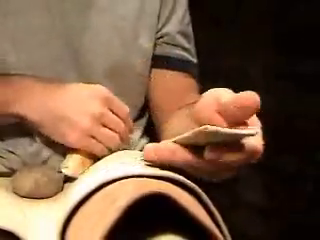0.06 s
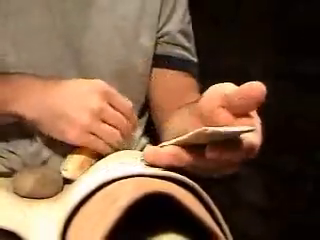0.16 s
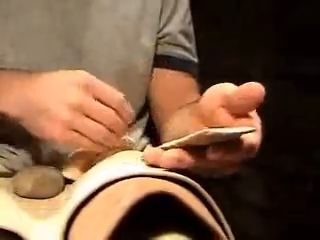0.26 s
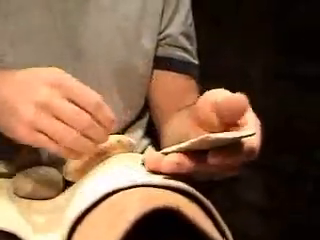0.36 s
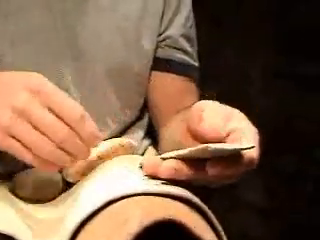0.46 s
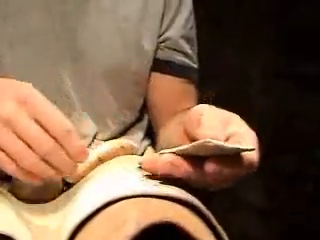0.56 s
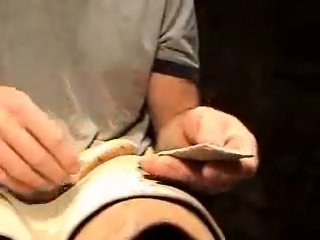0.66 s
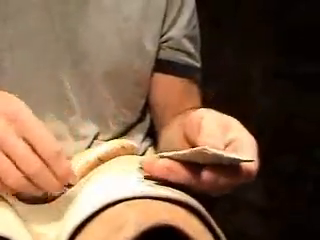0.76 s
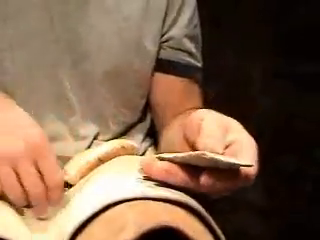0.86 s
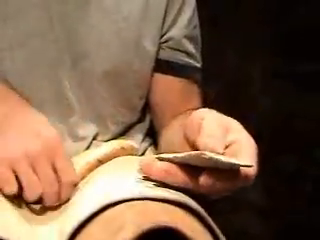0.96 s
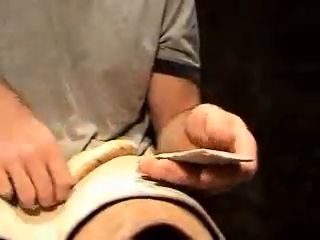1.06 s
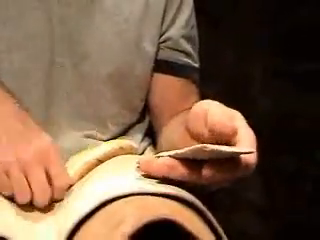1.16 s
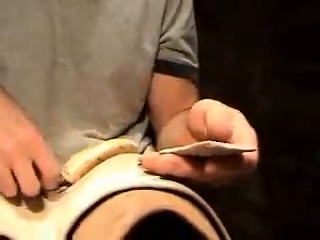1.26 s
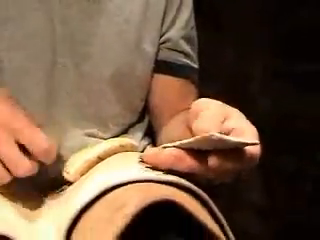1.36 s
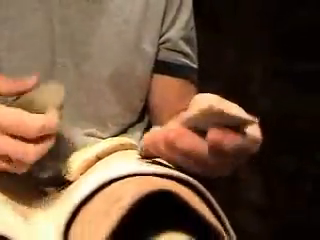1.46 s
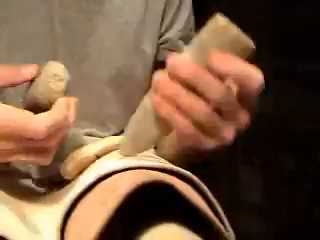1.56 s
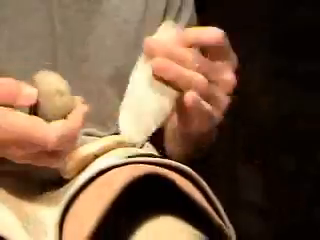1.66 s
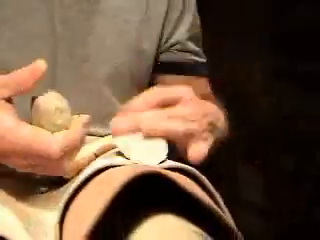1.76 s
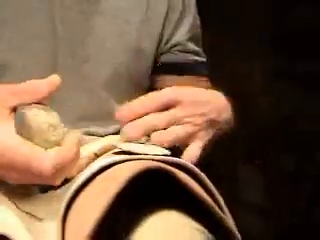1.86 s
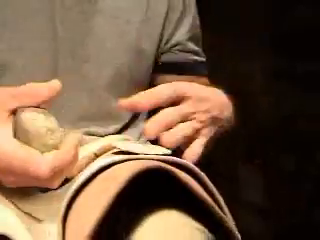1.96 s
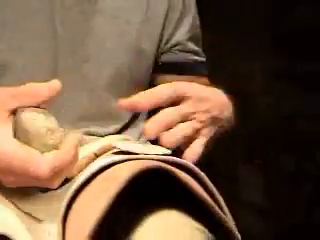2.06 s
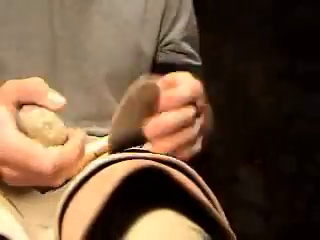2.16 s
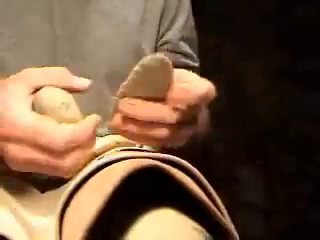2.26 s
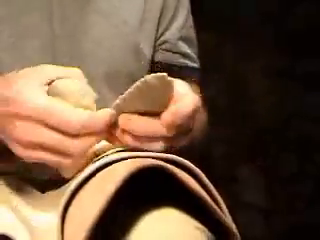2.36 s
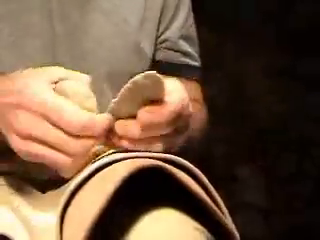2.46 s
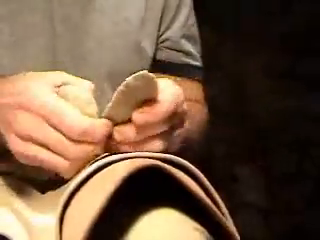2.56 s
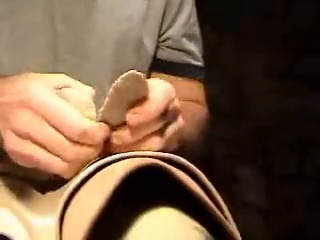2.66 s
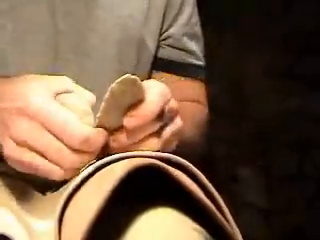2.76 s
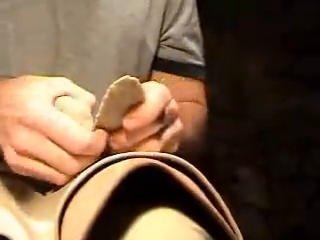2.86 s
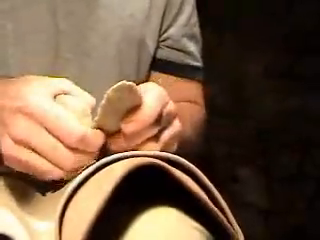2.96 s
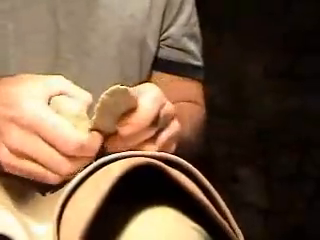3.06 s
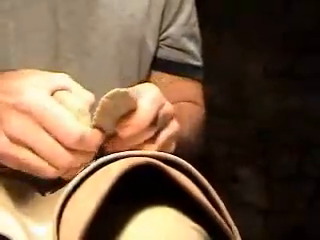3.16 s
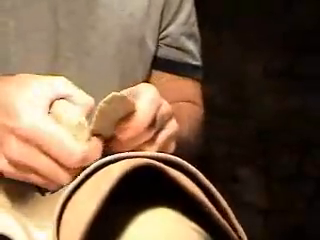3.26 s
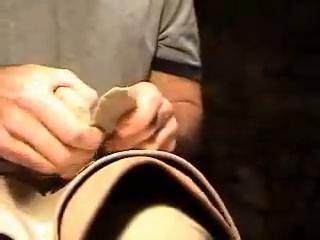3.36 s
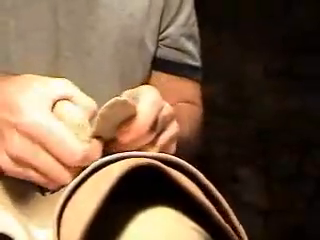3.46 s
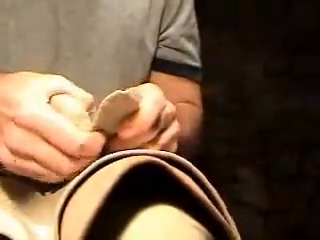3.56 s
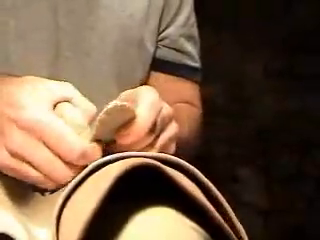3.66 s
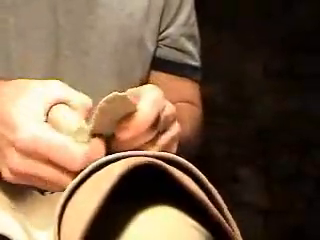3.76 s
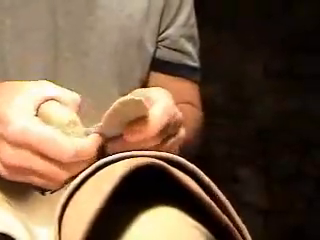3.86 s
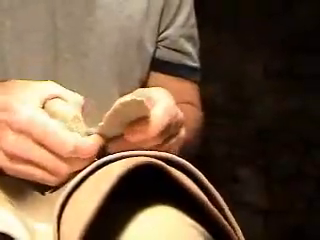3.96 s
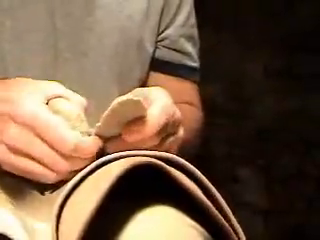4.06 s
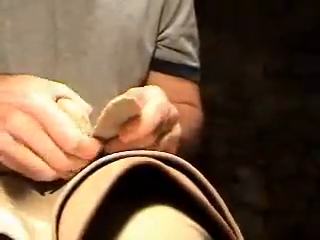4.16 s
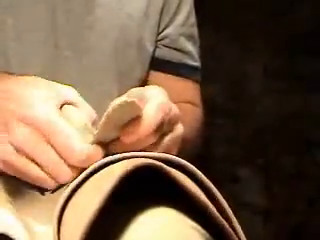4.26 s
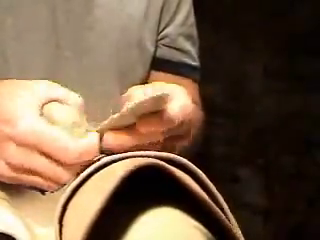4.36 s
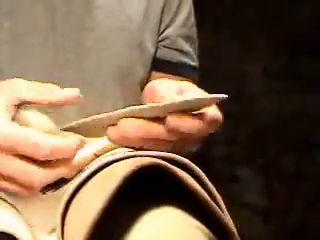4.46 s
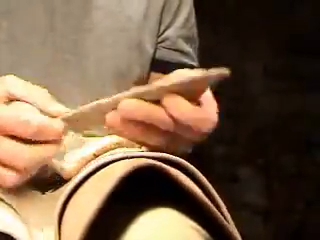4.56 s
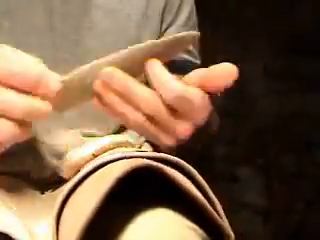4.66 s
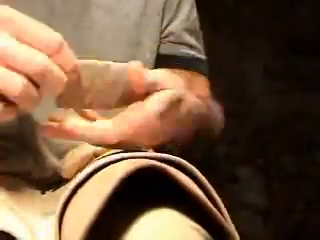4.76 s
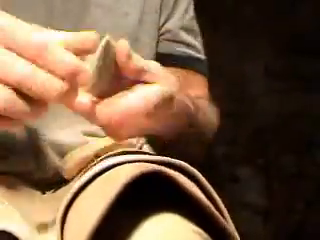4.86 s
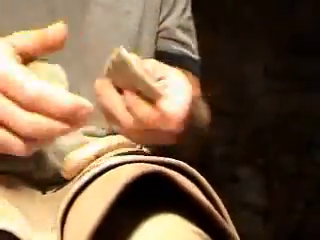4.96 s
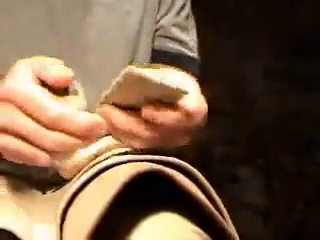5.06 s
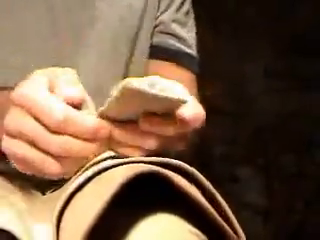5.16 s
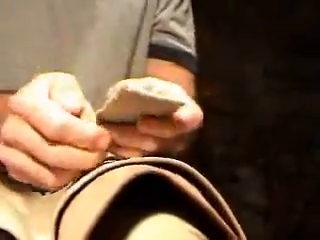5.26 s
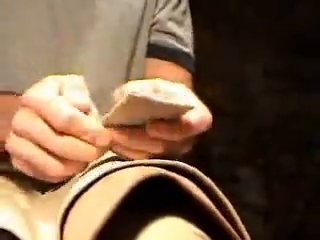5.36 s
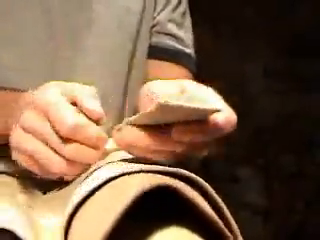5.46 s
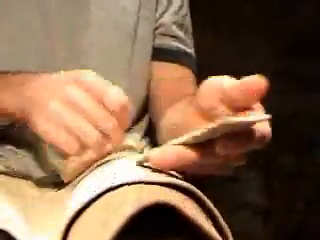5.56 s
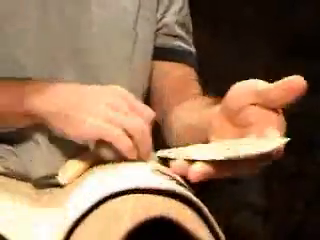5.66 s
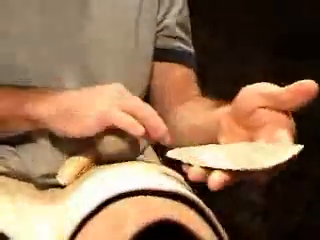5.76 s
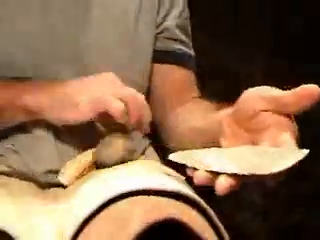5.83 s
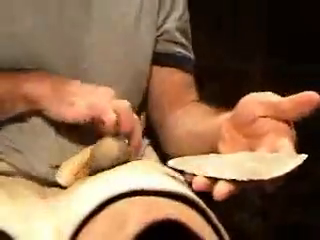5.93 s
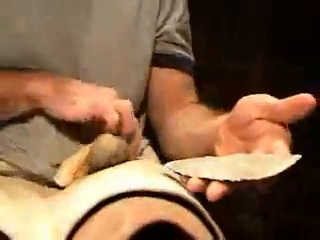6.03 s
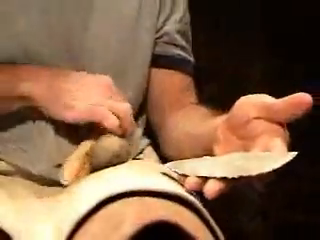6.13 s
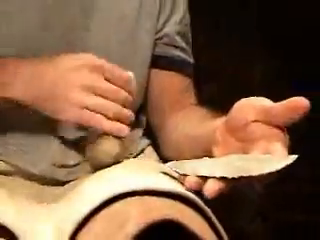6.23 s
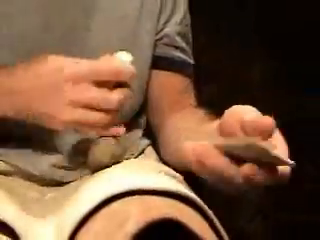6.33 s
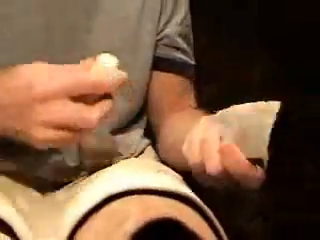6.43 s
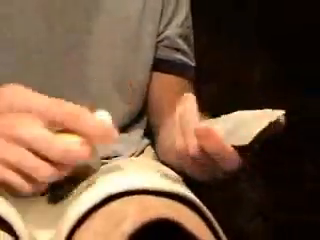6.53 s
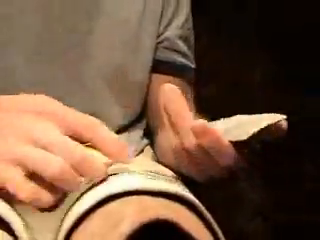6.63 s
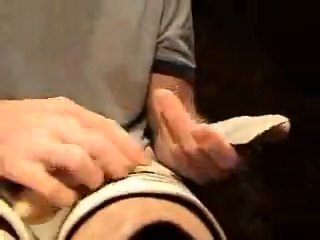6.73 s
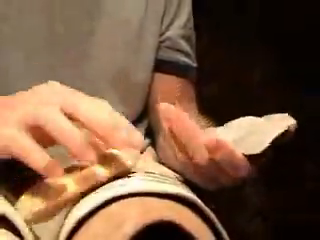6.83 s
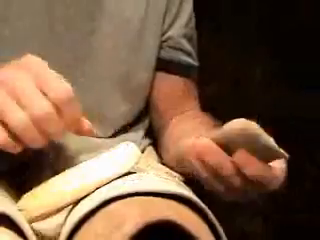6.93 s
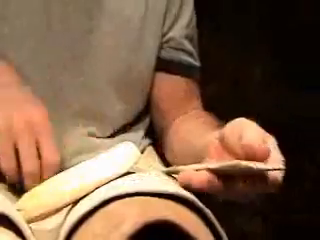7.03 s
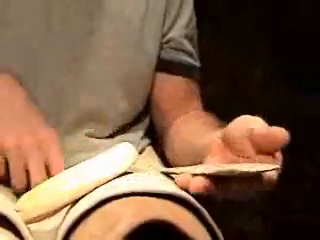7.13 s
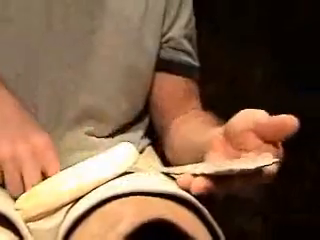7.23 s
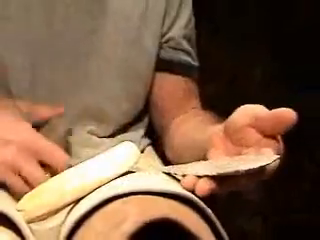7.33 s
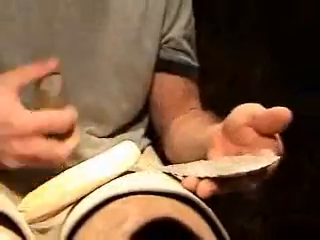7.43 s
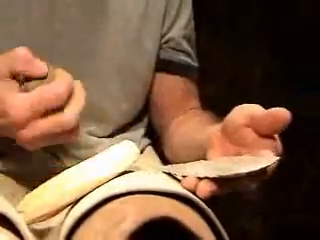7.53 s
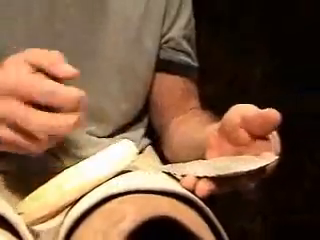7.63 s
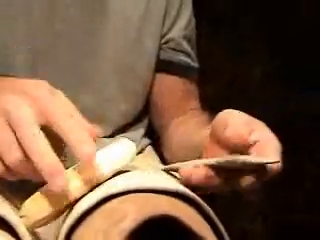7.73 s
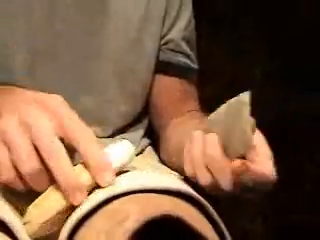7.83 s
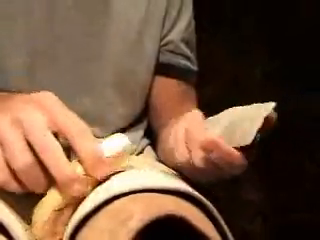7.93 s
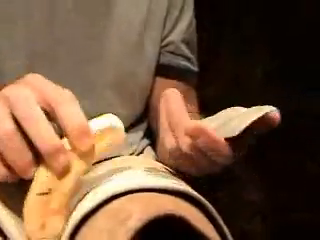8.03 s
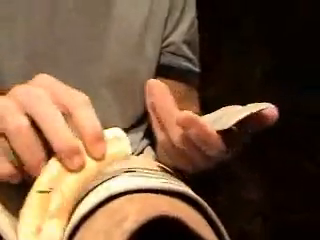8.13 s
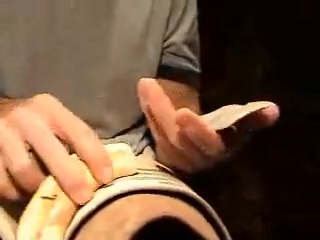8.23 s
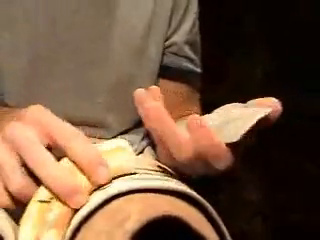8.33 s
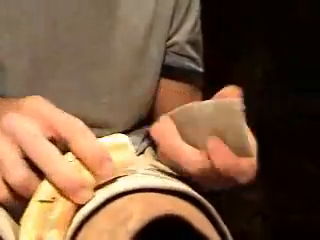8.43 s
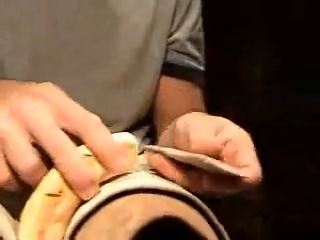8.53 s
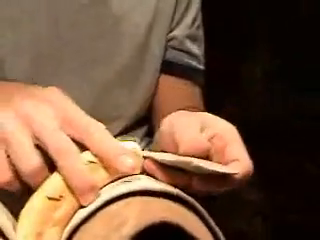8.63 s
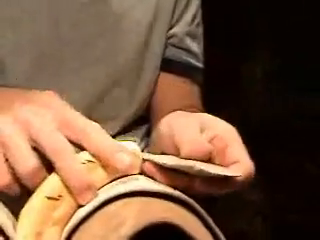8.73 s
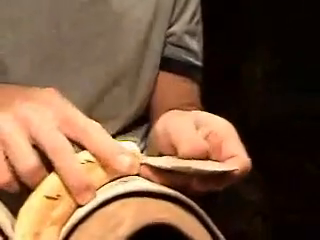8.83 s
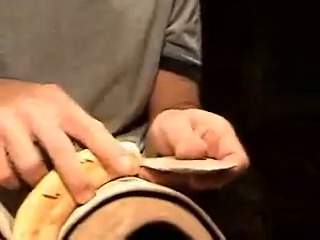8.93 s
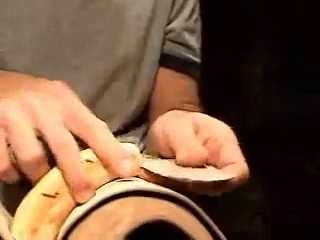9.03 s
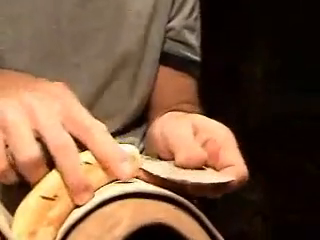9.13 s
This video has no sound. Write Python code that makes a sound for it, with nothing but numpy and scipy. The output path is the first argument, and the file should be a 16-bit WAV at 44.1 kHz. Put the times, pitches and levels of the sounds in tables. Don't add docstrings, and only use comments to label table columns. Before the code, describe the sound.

In a small room, close to the microphone, hands pick through stones on a leather pad with light knocks and cloth rustle. A pebble then rasps a flint edge in fast, gritty, sharply snapping strokes, pauses, gives two short touch-ups, and tools are set down with a hard clack, dull taps and shuffling over faint low hum.

```python
import sys
import numpy as np
from scipy import signal
from scipy.fft import rfft, irfft, next_fast_len
from scipy.io import wavfile
from scipy.ndimage import uniform_filter1d, map_coordinates

SR = 44100
rng = np.random.default_rng(int(sys.argv[2]) if len(sys.argv) > 2 else 0)


def wrap_up_sound(samples):
    columns = np.atleast_2d(samples).T
    tamed = np.clip(columns, -1, 1)
    steps = np.round(tamed * 32767).astype(np.int16)
    wavfile.write(sys.argv[1], SR, steps)


def boost(x):
    u = np.asarray(x, float) / 20
    return 10 ** u


N = 405279
T = np.arange(N) / SR

# start [s], rise [s], fade [s], pressure [dB], grit over pressure [dB].
STROKES = [(2.842, 0.015, 0.072, -34.5, -14.5), (2.92, 0.097, 0.093, -17, -7), (3.1, .03, 0.099, -19.5, -9),
           (3.195, 0.026, 0.2, -16.5, -9.5), (3.378, 0.018, 0.44, -20, -3),
           (3.465, 0.012, 0.097, -13.5, -6), (3.541, 0.022, 0.056, -11.5, -7), (3.65, 0.014, 0.16, -15, -7),
           (3.763, 0.0092, 0.17, -20.5, -9.5), (3.855, 0.053, 0.15, -16, -5.5),
           (4.387, 0.043, 0.044, -18.5, -9.5), (4.458, .011, 0.13, -14.5, -10),
           (5.345, 0.078, 0.25, -13.5, -11.5), (5.491, 0.097, 0.12, -11.5, -11.5)]
# time
# [s], peak level [dB], blade pitch [Hz], length [ms].
CATCHES = [(2.929, -16, 2160, 1.4), (2.9471, -16, 2135, 1.6), (2.9637, -21, 2180, 0.95),
           (2.9769, -8, 2255, 1.15), (2.9894, 2.5, 2250, 0.77), (2.9927, -5.5, 2130, 1.1),
           (3.0049, -11.5, 2120, 0.95), (3.01, -14, 2080, 1.7), (3.0183, -12, 2060, 1),
           (3.0302, -14, 1970, 0.89), (3.0364, -16, 2045, 1.1), (3.0527, -17, 2090, 0.9),
           (3.12, -18, 2130, 1.1), (3.1257, -18, 2080, 1.1), (3.1323, -15.5, 2250, 0.8),
           (3.1375, -13.5, 2100, 2), (3.1453, -8.5, 2130, 1.1), (3.1515, -14.5, 2150, 1.1),
           (3.1575, -16, 2040, 1), (3.1761, -17, 2080, 2.4), (3.202, -11, 2070, 1.1),
           (3.2186, -4.5, 2235, 1.6), (3.2285, -12, 2080, 1.3), (3.2388, -9, 1966, 1.4),
           (3.2458, -6.5, 2024, 1.1), (3.2497, -8.5, 2130, 1.7), (3.2627, -13, 2130, 0.8),
           (3.2665, -24.5, 2170, 0.92), (3.2778, -21, 2030, 0.74), (3.2836, -19.5, 2020, 0.9),
           (3.2916, -25.5, 2140, 2), (3.2991, -18.5, 2220, 3), (3.3118, -15.5, 2050, 1.6),
           (3.3436, -18.5, 1920, 2.4),
           (3.4785, -11.5, 2143, 2.9),
    (3.567, -9, 2130, 3),
    (5.3439, -7, 2940, 1.2),
    (3.864, -14.5, 2257, 3.6),
    (4.418, -18.5, 2107, 2.1),
    (5.5185, -8, 2100, 1.6),
           (3.3905, -4, 2130, 1.3), (3.3963, -14, 2220, 0.51), (3.4007, -17.5, 2070, 1.4),
                 (3.4106, -6, 2230, 1.3), (3.4219, -18.5, 2140, 1.0), (3.4301, -10, 2300, 2),
                 (3.4409, -5, 2130, 0.67), (3.4457, -18, 2380, 1.6), (3.4581, -4.5, 2170, 2.2),
                 (3.4779, -25, 2330, 0.62), (3.485, -10.5, 2120, 1.3), (3.4908, -11, 2130, 1.7),
                 (3.4959, -22.5, 2110, 1.3), (3.5066, -9, 1990, 0.66), (3.5103, -14.5, 1970, 1.1),
                 (3.557, -7.5, 2130, 0.62), (3.5601, -7.5, 2090, 0.67), (3.5643, 2.5, 2160, 0.52),
                 (3.5729, -14, 2030, 1.8), (3.5836, -21, 1980, 1.2), (3.658, -15.5, 2260, 1.0),
                 (3.6651, -4.5, 2160, 1.1), (3.6698, -2, 2000, 1), (3.6756, -20.5, 2080, 1.9),
                 (3.6885, -7.5, 2146, 2.4), (3.6918, -9, 2120, 4.4), (3.6979, -7, 2120, 1.4),
                 (3.7105, -5, 2270, 1.0), (3.7137, -11.5, 2235, 1.7), (3.7185, -12, 1980, 0.9),
                 (3.7796, -10, 1950, 0.7), (3.7872, -5.5, 2090, 1.1), (3.7937, -18, 2160, 1.5),
                 (3.7971, -5, 2130, 1), (3.8022, -23, 2130, 0.63), (3.8707, -15.5, 2260, 1.6),
                 (3.8846, -12.5, 2130, 0.74), (3.9009, -4.5, 2080, 1.5), (3.9053, -9, 2220, 1.8),
                 (3.9154, -25.5, 2160, 0.77), (3.925, -19.5, 2120, 1.2), (3.9297, -1, 2090, 0.69),
                 (3.9423, -12, 2230, 0.43), (3.9499, -20, 2150, 1.2), (3.9551, -9.5, 2160, 1.2),
                 (3.9651, -13.5, 2210, 1.1), (3.9702, -12.5, 2200, 0.98), (3.9769, -21, 2080, 1.17),
           (4.4242, -4.5, 2155, 1.2), (4.434, -11, 1930, 0.88), (4.4431, -15.5, 2000, 1.7),
             (4.4679, -3.5, 2080, 0.96), (4.4784, -14, 2160, 0.93), (4.4951, -10, 2400, 1.3),
             (4.4986, -12, 2340, 2), (4.5059, -9, 2180, 0.65), (4.523, -9, 2190, 0.6),
             (4.527, -13.5, 2030, 1.2), (5.3447, -4, 2196, 1.3), (5.3493, -7.5, 2020, 2),
             (5.3568, -15.5, 2040, 1.1), (5.3974, -12.5, 2300, 1.1), (5.406, -13, 1960, 2.7),
             (5.4157, -16, 2300, 1.1), (5.4193, -7.5, 1970, 2.1), (5.4292, -11.5, 2350, 0.6),
             (5.4381, -8, 2230, 1.2), (5.443, -15, 2150, 2.1), (5.4498, -10.5, 2170, 1.5),
             (5.453, -14, 2120, 0.9), (5.4604, -11.5, 1980, 2), (5.4674, -7.5, 2000, 1.3),
             (5.476, -14.5, 2420, 1.0), (5.4806, -8.5, 2020, 1.0), (5.4903, -16.5, 1850, 3.1),
             (5.522, -2.5, 2210, 1.0), (5.524, -7.5, 1960, 0.38), (5.5328, -10.5, 2120, 0.67),
             (5.5352, 2, 2070, 1.1), (5.5411, -6, 2260, 0.57), (5.5477, -5, 2250, 0.65),
             (5.549, -9.5, 1980, 2.1), (5.5572, -3.5, 2100, 0.81), (5.5608, -14, 2140, 1.3),
             (5.5631, -10, 2390, 0.44), (5.5671, -7, 2040, 2.3), (5.571, -9.5, 2120, 1.3),
             (5.5765, -6.5, 2080, 0.26), (5.5803, -11.5, 2020, 0.9), (5.5845, -10, 1970, 1.2),
             (5.5904, -10.5, 2010, 0.51), (5.595, -9.5, 2120, 1.7), (5.6013, -22, 2230, 0.49),
             (5.6031, -10.5, 2060, 0.44), (5.6068, -27.5, 2130, 0.72), (5.624, -25, 2010, 1.7)]
STRONG_CATCHES = CATCHES
# frequency [Hz], width [Hz], level [dB].
GRIPPED_BLADE = [(1100, 395, -11), (1832, 70, 1), (2130, 173, -1), (2460, 304, -3), (2757, 470, -8)]
# frequency [Hz], density [dB per Hz].
GRIT_SPECTRUM = [(2600, -25), (3250, -16.5), (3700, 4), (4100, -4), (4600, 3.5), (5300, 3.5), (6400, 1),
                 (7900, -1.5), (9000, -10)]
# frequency [Hz], width [Hz], level [dB].
HAND = [(165, 150, -7), (336, 220, -0.5), (697, 190, -0.5), (1003, 144, 6.5), (1470, 700, -8.5)]

# frequency [Hz], width [Hz], level [dB].
LOOSE_BLADE = [(1933, 14, 2.5), (4687, 42, -1.5), (5560, 43, -5.5), (6370, 35, -23), (7500, 29, -10)]
# peak [s], level [dB], rise [s], fall [s], upper modes [dB].
BRUSHES = [(.088, -58.5, 0.053, 0.056, 2), (1.81, -41.5, 0.062, 0.051, -1.5), (2.045, -54, 0.07, 0.016, 7),
           (2.438, -51, 0.076, 0.089, -2.5), (4.76, -65, 0.025, .05, 1), (4.824, -68.5, .015, 0.029, 12),
           (4.94, -62, .03, 0.057, 2.5), (5.065, -55, 0.04, 0.065, 0.5), (5.68, -46, .03, .15, -10),
           (7.135, -59.5, .03, 0.073, 3), (8.048, -70, .08, .11, 0), (8.665, -64, 0.03, 0.051, 10)]

# time [s], peak level [dB], knock pitch [Hz], low part
# [dB], high part [dB].
KNOCKS = [(0.245, -36, 802, 2, -21), (0.599, -15, 2380, -26, -7), (0.61, -21, 2460, -24, 5),
          (0.631, -34, 1780, -14, 7), (0.783, -37, 2470, -20, -3), (0.904, -35, 1370, -21, -12),
          (1.022, -25.5, 913, -6, 7), (1.171, -30, 1640, -14, -16), (1.341, -52, 1190, -5.5, -4),
          (1.488, -28.5, 1970, -25, -6), (1.531, -31.5, 1110, -9, 0), (1.619, -29, 2420, -16, -18),
          (2.261, -30, 1710, -4, -29), (4.379, -23, 1980, -10.5, -11), (4.821, -43, 2390, -12.5, 2),
          (4.967, -33.5, 1925, -26, -2), (5.791, -39, 2100, -16, -7), (5.852, -29.5, 2350, -12, -0.5),
          (6.159, -31, 1510, -11.5, -34), (6.785, -17, 1515, -5.5, -39), (6.858, -26.5, 1626, -9.5, 4.5),
          (6.88, -25, 1010, -4, -7), (7.185, -28, 1800, 2.5, -36), (7.293, -31.5, 1170, -14, 3),
          (7.317, -30, 1323, 2.5, -22), (7.999, -30, 952, -16, -18), (8.271, -39, 958, -21, -21),
          (8.374, -35, 1610, -10, -21),
          (1.9495, -23.5, 940, 4, -30),
    (2.058, -20, 1590, -2, -24),
    (5.3439, -10, 2690, -21, -13),
    (6.0433, -19, 1210, -9, -28),
    (7.3595, -26, 1390, -2.5, -22),
    (7.4346, -16.5, 1093, -2, -10.5),
    (8.407, -28.5, 1180, -1, -22),
]
# frequency [Hz], width [Hz], level [dB].
PAD = [(242, 350, -1.5), (481, 110, 7.0), (740, 120, -0.5)]
# frequency [Hz], width [Hz], level [dB].
TICK = [(4100, 880, -4.0), (4930, 320, 2.0), (6430, 630, 0.5), (7850, 720, -1.0)]
# frequency [Hz], t60 [s], level [dB].
PUNCH = [(448, 0.0088, -8), (1070, .012, -4.5), (1570, 0.026, -8.5), (1880, .014, -5), (2350, 0.013, -4),
         (2740, .022, -1), (3220, 0.013, -1.5), (5070, 0.018, -7), (6500, 0.033, -23.5),
         (7200, 0.027, -22.5)]

# peak [s], body level [dB],
# hiss over body [dB], rise [s], fall [s].
RUSTLES = [(.274, -44.5, -10.5, 0.11, 0.18), (0.617, -38, 6, 0.044, 0.12), (0.731, -51.5, -2, 0.06, 0.29),
           (.918, -53.5, 5.5, 0.08, 0.065), (1.032, -39.5, 2, 0.021, 0.16), (1.167, -45, -16, 0.87, 0.11),
           (1.349, -40, -2.5, 0.064, 0.24), (1.63, -44, -0.5, 0.045, 0.13),
           (1.805, -39.5, 0.5, 0.097, 0.075), (1.951, -48, 2, 0.039, 0.0595),
           (2.061, -40.5, -16, 0.049, 0.065), (2.275, -43, -15, 0.03, 0.15), (2.41, -43, -5, 0.19, 0.14),
           (2.801, -51.5, -16, .4, 0.24),
           (4.711, -54, -12, 0.0505, 0.16), (5.04, -55.5, 5, 0.17, 0.077), (5.75, -51, -6.5, .05, 0.23),
               (5.878, -60.5, 14.5, 0.16, 0.026), (5.904, -27.5, -30, 0.021, .14),
               (6.175, -43.5, -24, 0.72, 0.09), (6.385, -49.5, -4, 0.1, 0.16),
               (6.79, -36.5, -25, 0.012, 0.097), (6.869, -39.5, 1, 0.026, 0.1),
               (6.988, -34.5, -3.5, 0.067, 0.027), (7.139, -56, -4, .08, 0.091),
               (7.199, -43.5, -28, 0.074, .1), (7.298, -41.5, -7.5, 0.053, 0.062),
               (7.442, -38, -7, .1, 0.096), (7.673, -58, 3, 0.1, 0.102), (8.065, -38.5, -4, 0.071, 0.089),
               (8.186, -43, -3.5, 0.099, 0.21), (8.416, -48, -6.5, 0.27, 0.78), (8.55, -47.5, -8, 0.15, .1),
               (8.7, -60, 7, .1, 0.11), (8.939, -54.5, -1, 0.28, 0.09), (9.19, -45.5, -9, 0.11, .1)]
# frequency [Hz], density [dB per Hz].
CLOTH = [(150, -3.5), (400, -0.5), (1000, 2), (2000, 0), (3000, -9), (4500, -24.5)]
# frequency [Hz], density [dB per Hz].
FIZZ = [(1800, -14), (3000, -2), (5000, 0), (7500, -1.5), (9000, -4)]

# frequency [Hz], t60 [s].
ROOM = [(200, 0.27), (1000, 0.67), (2100, 0.44), (5000, 0.56), (8000, 0.22)]
# time [s], pitch [Hz], level [dB].
ENGINE = [(0.0, 30, -56), (0.36, 29.78, -50.5), (0.49, 31.7, -62), (1.3, 28.56, -62.5), (2.94, 27.7, -47),
          (4.61, 27.8, -60), (5.35, 28.2, -56), (5.89, 28.56, -56.5), (6.07, 37.9, -66), (6.4, 47.7, -53),
          (8.88, 60, -54.5), (9.09, 65.2, -55.5), (9.19, 64.8, -59)]
# frequency [Hz], width [Hz], level [dB].
HUM = [(74.1, 13, 2.5), (114, 26, -3.5), (180.1, 12, -3)]
# frequency [Hz], density [dB per Hz].
AIR = [(40, -4.5), (100, 0.5), (250, -1.5), (600, -5.5), (1000, -4.5), (1300, -10), (2500, -14.5),
       (5000, -18), (7300, -20), (8100, -27.5)]
# frequency [Hz], likeness [-1 to 1].
ALIKE = [(60, 0.99), (130, 1), (300, 0.36), (670, -0.45), (1500, 0.66), (3350, 0.71), (7490, 1)]
# frequency [Hz], gain [dB].
BAND_LIMIT = [(7600, 1.5), (8000, -14.5), (8180, -34.5)]
# frequency [Hz], density [dB per Hz].
DIRT = [(7900, -66), (8100, -9), (9500, -1.5), (9700, -8.5), (11100, -6.5), (11400, -28), (14400, -26.5),
        (14600, -13.5), (15700, -4)]


def unit(x):
    return x / np.sqrt(np.mean(x ** 2) + 1e-20)


def peak(x):
    return x / np.abs(x).max()


def along(points, hz):
    f, v = np.transpose(points)
    return np.interp(np.log(hz + 1), np.log(f + 1), v)


def wobble(rate):
    knots = rng.standard_normal(int(N * rate / SR) + 4)
    return map_coordinates(knots, [T * rate])


def filtered(x, response):
    m = next_fast_len(x.shape[-1] + 8192)
    return irfft(rfft(x, m) * response(np.fft.rfftfreq(m, 1 / SR)), m)[..., :x.shape[-1]]


def modes(table):
    def response(f):
        return sum((-1) ** k * boost(db) * 1j * f * width / (hz * hz - f * f + 1j * f * width)
                   for k, (hz, width, db) in enumerate(table))
    return response


def shape(table):
    return lambda f: boost(along(table, f))


def grains(spread_db, rate):
    return rng.standard_normal(N) * boost(spread_db * wobble(rate))


def burst(t60, rise):
    t = T[:SR // 8]
    return rng.standard_normal(len(t)) * boost(-60 * t / t60) * (1 - np.exp(-t / rise))


def swells(rows, swing=1):
    s, db, rise, fall = np.transpose(rows)[..., None]
    t = T[::16]
    away = np.maximum((s - t) / rise, (t - s) / fall)
    swell_db = 14.5
    level_db = (db - swing * swell_db * away).max(0).clip(-120)
    return uniform_filter1d(np.interp(T, t, level_db), size=200)


def grinding():
    press_db, hiss_db, push_db = strokes()
    grit = grains(spread_db=2.0, rate=300)
    snaps = slips(np.r_[STRONG_CATCHES, chatter(press_db)])
    thrown = uniform_filter1d(np.abs(snaps), size=90) / (boost(press_db) + 0.0014)
    blade = boost(press_db - 7.5) * unit(filtered(grit, modes(GRIPPED_BLADE)))
    hiss = boost(-1.0) * filtered(unit(grit) * (1 + 0.94 * thrown) * boost(hiss_db), shape(GRIT_SPECTRUM))
    push = boost(8.0) * filtered(unit(grit) * (1 + 1.04 * thrown) * boost(push_db), modes(HAND))
    return snaps + blade + hiss + push


def strokes():
    turn_db = 2.5
    out = np.full((3, N), -120.)
    for s, rise, fade, db, grit_db in STROKES:
        t = T[T >= s] - s
        bite_db = 21.5 * (1 - t / rise).clip(0) ** 1.54
        fade_db = 21 * ((t - rise) / fade).clip(0) ** 1.18
        loss_db = bite_db + fade_db
        push_db = -10 - 2.1 * (s - STROKES[0][0]) ** 2
        fresh = db - loss_db, db + grit_db - loss_db, db + push_db - 0.87 * loss_db
        out[:, T >= s] = np.maximum(out[:, T >= s] - turn_db, fresh)
    return uniform_filter1d(out.clip(-120), size=200, axis=1)


def chatter(press_db):
    per_s, settle_s, lift_db = 75, 0.007, -30
    luck = rng.standard_normal((int(N / SR * per_s) - 1, 3))
    s = np.abs(np.arange(len(luck)) + 0.3 * luck[:, 0]) / per_s
    db = press_db[(s * SR).astype(int)]
    pitch_hz = 2120 * (1 + 0.025 * luck[:, 1])
    length_ms = 1.4 * np.exp(0.4 * luck[:, 2])
    free = np.abs(s[:, None] - np.transpose(STRONG_CATCHES)[0]).min(1) > settle_s
    return np.c_[s, db, pitch_hz, length_ms][free & (db > lift_db)]


def slips(rows):
    out, t = np.zeros(N + SR), T[T < 0.06]
    phases = 2 * np.pi * rng.random(size=(len(rows), 3))
    for (s, db, hz, ms), phase in zip(rows, phases):
        attack = 1 - np.exp(-(t / 0.00076) ** 1.27)
        decay = np.exp(-0.33 * (t / (ms / 1000)) ** 1.54)
        ring = np.sin(2 * np.pi * hz * t + phase[0])
        ring += boost(-13.5) * np.sin(2 * np.pi * 1.081 * hz * t + phase[1])
        ring += boost(-12.5) * np.sin(2 * np.pi * 0.847 * hz * t + phase[2])
        start = round((s - 0.0008) * SR)
        out[start:][:len(t)] += boost(db - 2.5) * peak(attack * decay) * ring
    return out[:N]


def knocks():
    out = np.zeros(N + SR)
    for s, db, hz, low_db, high_db in KNOCKS:
        blow = 0.25 * burst(t60=0.02, rise=0.0001)
        blow[0] += 1.6
        scuff = 0.16 * burst(t60=0.092, rise=0.0045)
        body = peak(filtered(blow + scuff, modes(PAD)))
        knock = peak(filtered(blow, modes([(hz, 0.4 * hz, 0), (hz + 1500, 1300, -9)])))
        tick = peak(filtered(blow, modes(TICK)))
        hit = knock + boost(low_db) * body + boost(high_db) * tick
        out[round(s * SR):][:len(blow)] += boost(db - 2.5) * hit
    return out[:N]


def drop():
    blow, t = np.zeros(N), T[T < 0.08]
    hit = round(5.8896 * SR)
    lead_in = burst(t60=0.045, rise=0.0025)[:round(0.006 * SR)]
    blow[hit - len(lead_in):hit] = boost(-44) * lead_in
    blow[hit] = 1
    ring = sum((-1) ** k * boost(db - 60 * t / t60) * np.sin(2 * np.pi * hz * t)
               for k, (hz, t60, db) in enumerate(PUNCH))
    ring = ring * (1 - np.exp(-t / 0.00015))
    return peak(signal.fftconvolve(blow, ring)[:N])


def brush():
    s, db, rise, fall, high_db = np.transpose(BRUSHES)
    skin = grains(spread_db=1, rate=36)
    low = unit(filtered(skin, modes(LOOSE_BLADE[:1])))
    high = unit(filtered(skin, modes(LOOSE_BLADE[1:])))
    low_level_db = swells(np.c_[s, db, rise, fall]) + 3
    high_level_db = swells(np.c_[s, db + high_db, rise, fall]) + 2.5
    return boost(low_level_db) * low + boost(high_level_db) * high


def rustle():
    s, db, hiss_db, rise, fall = np.transpose(RUSTLES)
    body_db = np.maximum(-64.5, swells(np.c_[s, db, rise, fall]))
    hiss_db = np.maximum(-81, swells(np.c_[s, db + hiss_db, rise, fall], swing=1.14))
    crumple = grains(spread_db=2, rate=120) * boost(1.63 * wobble(30))
    body = boost(body_db - 3.5) * unit(filtered(crumple, shape(CLOTH)))
    hiss = boost(hiss_db - 2.0) * unit(filtered(crumple, shape(FIZZ)))
    return body + hiss


def room(x):
    out, step = np.zeros((2, N + 2 * SR)), SR // 8
    delay = 300
    for start in range(0, N, step):
        hz, t, z = signal.stft(rng.standard_normal((3, SR // 2)), SR, nperseg=256)
        decay = boost(-60 * t / along(ROOM, hz)[:, None])
        tail = signal.istft(z * decay, SR, nperseg=256)[1]
        pair = (tail[0] + 1.5 * tail[1:]) / np.linalg.norm(tail[0]) / 1.3
        wet = signal.fftconvolve(x[None, start:start + step], pair, axes=1)
        out[:, start + delay:start + delay + wet.shape[1]] += wet
    return out[:, :N]


def rumble():
    s, hz, db = np.transpose(ENGINE)
    hz, db = np.interp(T, s, hz), np.interp(T, s, db)
    phase = 2 * np.pi * np.cumsum(hz * (1 + 0.0203 * wobble(3.2))) / SR
    engine = boost(db + 2 + 2.3 * wobble(9.4)) * np.sin(phase)
    engine += boost(-59 + 1.4 * wobble(9.4)) * np.sin(2 * phase)
    sway = boost([[0.7], [-0.7]] * wobble(4))
    mid, side = filtered(rng.standard_normal((2, N)), modes(HUM))
    return engine * sway + boost(-60.0) * unit(mid + 0.49 * np.array([side, -side]))


def air():
    def mid_side(hz):
        angle = np.arccos(np.clip(along(ALIKE, hz), -1, 1)) / 2
        return boost(along(AIR, hz)) * [np.cos(angle), np.sin(angle)]

    mid, side = filtered(rng.standard_normal((2, N)), mid_side)
    level_db = -53 + 0.34 + 0.51 * wobble(3.097)
    return boost(level_db) * unit(np.array([mid + side, mid - side]))


def scene():
    near = grinding() + knocks() + drop() + brush() + rustle()
    return near * boost([[0.3], [-0.3]]) + boost(-17.0) * room(near) + rumble() + air()


def drop_weak_bands(x, depth_db, scatter_db, tilt_db):
    z = signal.stft(np.array([x[0] + x[1], x[0] - x[1]]) / 2, nperseg=2048)[2]
    band = (13 * np.log(1 + np.arange(z.shape[1]) / 22) ** 1.5).astype(int)
    member = band == np.arange(band.max() + 1)[:, None]
    averaging = member / member.sum(1, keepdims=True).clip(1)
    level_db = 10 * np.log10(averaging @ np.abs(z) ** 2 + 1e-14)
    loudest_db = level_db[0, 6:].max(0)
    luck = unit(uniform_filter1d(rng.standard_normal(level_db.shape), size=5, axis=2))
    margin_db = level_db - loudest_db + depth_db + scatter_db * luck
    margin_db[1] -= tilt_db * np.maximum(np.arange(len(member)) - 52, 0)[:, None]
    keep = 0.03 + 0.97 / (1 + np.exp(-2 * np.clip(margin_db, -15, 15)))
    mid, side = signal.istft(z * keep[:, band], nperseg=2048)[1][:, :N]
    return np.array([mid + side, mid - side])


def top_cut(x):
    return signal.sosfilt(signal.butter(12, 15780, fs=SR, output="sos"), x)


def record(dry):
    x = dry + boost(-14.5) * filtered(dry ** 2, modes([(95, 150, 0)]))
    x = x / (1 + np.abs(x / 0.72) ** 4) ** 0.25
    x = drop_weak_bands(x, depth_db=31, scatter_db=8.5, tilt_db=1.5)
    x = filtered(x, shape(BAND_LIMIT))
    loudness = np.sqrt(np.abs(uniform_filter1d(x.mean(0) ** 2, size=1500)))
    dirt = unit(filtered(rng.standard_normal((2, N)), shape(DIRT)))
    x = x + boost(-41.5) * loudness * dirt
    return top_cut(x)


dry = scene()
out = record(dry)
wrap_up_sound(out)
```